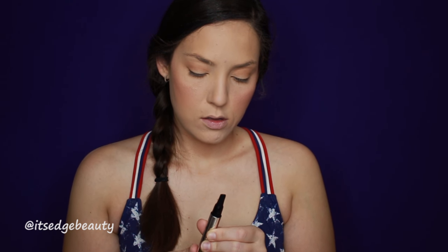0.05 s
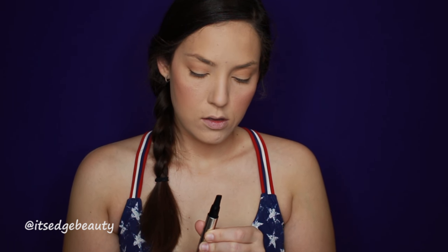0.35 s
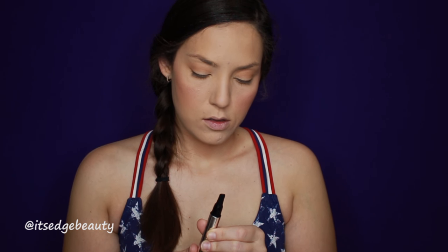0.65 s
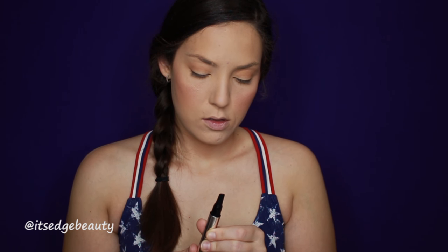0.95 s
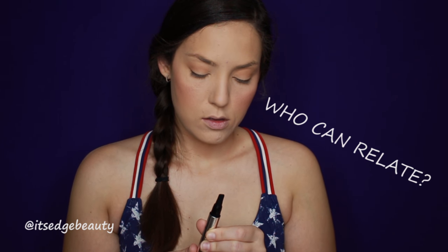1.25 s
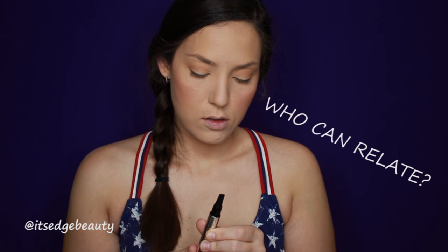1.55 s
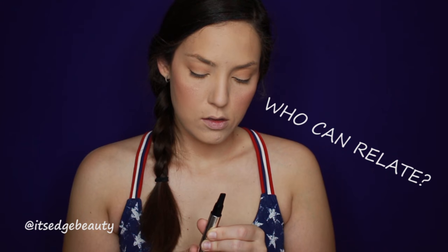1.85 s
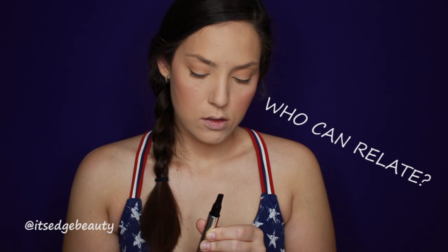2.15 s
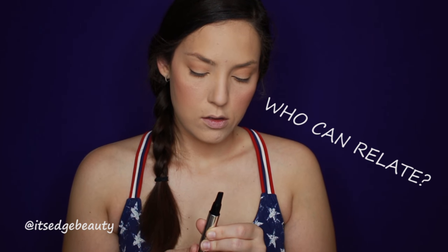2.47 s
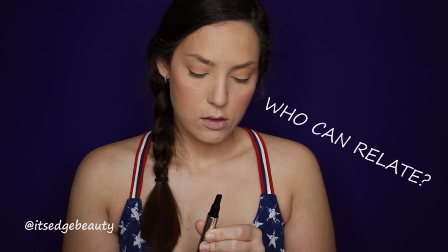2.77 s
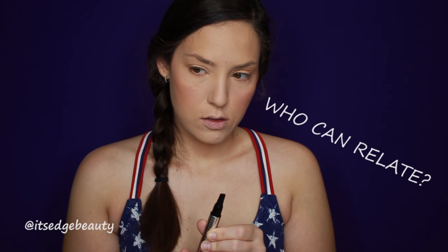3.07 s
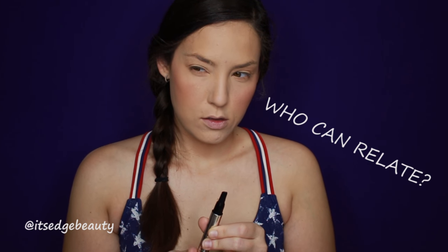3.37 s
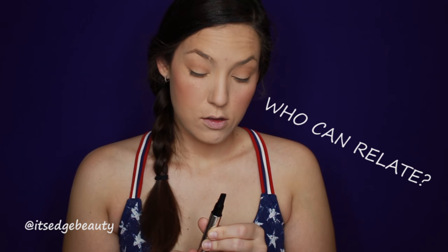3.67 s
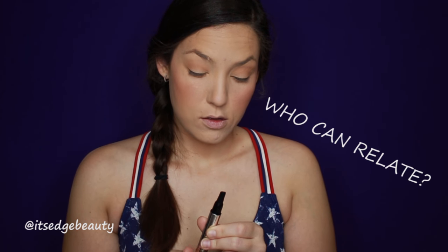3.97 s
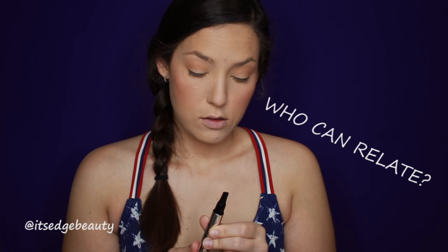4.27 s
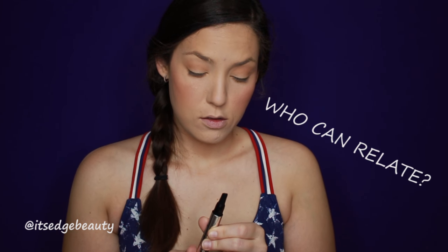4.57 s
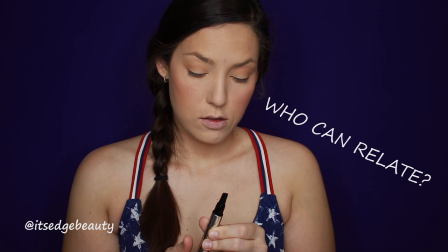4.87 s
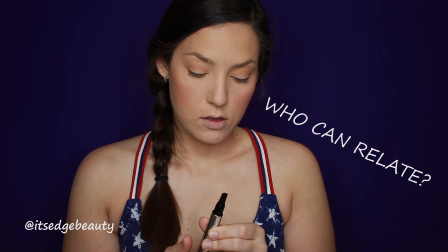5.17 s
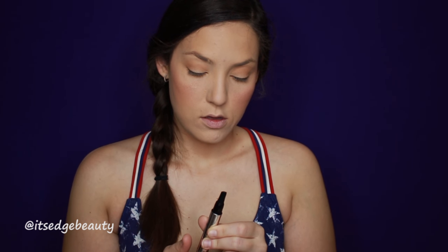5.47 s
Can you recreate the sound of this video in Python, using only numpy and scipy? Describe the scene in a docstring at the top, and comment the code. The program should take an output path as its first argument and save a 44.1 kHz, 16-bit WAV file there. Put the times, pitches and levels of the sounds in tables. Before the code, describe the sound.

A plastic cosmetic click pen is pumped close to the microphone in a small, dry room. It clicks twice, rests for over a second, then clicks fourteen more times at an even pace of four or five a second. Each press is a tiny, crisp burst of ratchet ticks. A ventilation fan hums softly underneath the whole time, with a faint rush of air.

```python
"""In a small, dry room a ventilation fan hums while a plastic click pen is pumped close by.
The fan gives a rush of air coloured by its duct, wavering tones and a low drone.
The pen is pressed twice and, after a pause, fourteen more times. Each press is a quick, slowing run
of two to five ratchet ticks: the pawl strikes tooth after tooth and rings the barrel.
The room answers each tick with a short tail of reflections."""
import sys
import numpy as np
from scipy import signal
from scipy.fft import rfft, irfft
from scipy.io import wavfile
from scipy.ndimage import uniform_filter1d

SR = 44100
rng = np.random.default_rng(int(sys.argv[2]) if len(sys.argv) > 2 else 0)


def generate_wav(signal):
    """Clip the signal to [-1, 1] and save it as 16-bit WAV at the path in sys.argv[1]."""
    frames = np.transpose(np.atleast_2d(signal))
    scaled = np.clip(frames, -1, 1) * 32767
    pcm = np.round(scaled).astype(np.int16)
    wavfile.write(sys.argv[1], SR, pcm)


N = 252693


def from_db(db):
    """Amplitude ratio: tenfold for every 20 dB."""
    return 10 ** (np.asarray(db) / 20)


def unit_energy(x):
    """Normalisation: the squared magnitudes sum to one."""
    return x / np.sqrt(np.sum(abs(x) ** 2) + 1e-20)


def curve_at(points, hz):
    """Interpolation of (frequency [Hz], value) points on a log-frequency axis."""
    f, value = np.transpose(points)
    return np.interp(np.log(hz + 1), np.log(f + 1), value)


def add(mix, start_s, sound):
    """Superposition: a sound adds to the mix from its start time on."""
    part = mix[round(start_s * SR):][:len(sound)]
    part += sound[:len(part)]


def resonant_gain(colour, modes, hz):
    """Resonance: modal peaks add in power to a broad colour."""
    peaks = sum(from_db(db) ** 2 / (1 + 2 * ((hz - f) / width) ** 2) ** 2 for f, width, db in modes)
    return np.sqrt(from_db(curve_at(colour, hz)) ** 2 + peaks)


def minimum_phase(gain):
    """Causality: a struck body rings after the blow, never before."""
    log_gain = np.log(np.concatenate([gain, gain[-2:0:-1]]) + 1e-6)
    return gain * np.exp(-1j * signal.hilbert(log_gain).imag[:len(gain)])


def fan_rush():
    """Flow noise: moving air excites the resonances of the duct."""
    # rush of air and even hiss: (frequency [Hz], spectral density [dB re 1/Hz])
    air = [(20, -92), (55, -86), (110, -72), (150, -67), (200, -78.5), (260, -66.5), (400, -75), (520, -80),
           (950, -91.5), (2400, -87), (3500, -99), (7000, -102.5), (15700, -103), (16200, -125)]
    # duct resonances: (frequency [Hz], width [Hz], peak density [dB re 1/Hz])
    duct_modes = [(179.5, 13.4, -62), (223.7, 5.4, -61), (312.3, 5, -65.5), (366, 6.9, -66), (369, 29, -73),
                  (649, 25, -70.5), (678, 18, -72), (787, 67, -77.5), (1074, 52, -82), (1425, 17, -83.5),
                  (1595, 60, -75), (1907, 18, -77.5)]
    hz = np.fft.rfftfreq(N, 1 / SR)
    gain = resonant_gain(air, duct_modes, hz) * np.sqrt(SR / 2)
    return irfft(rfft(rng.standard_normal(N)) * gain, N)


def fan_hum(waver_hz=3.0, knots=512):
    """Random modulation: the fan's tones waver in level and phase, each to its own depth."""
    # fan tones: (frequency [Hz], rms level [dB], waver [0-1])
    tones = [(44, -51.5, 0.16), (130.8, -51, 0.12), (414.2, -57.5, 0.53), (534, -61.5, 0.47),
             (1531, -66, 0), (3760, -74, 0.1)]
    t, knot_s = np.arange(N) / SR, np.linspace(0, N / SR, knots)
    low_pass = np.exp(-(np.fft.fftfreq(knots, knot_s[1]) / waver_hz) ** 2 / 2)
    out = np.zeros(N)
    for hz, db, waver in tones:
        real, imag = rng.standard_normal((2, knots))
        drift = unit_energy(np.fft.ifft((real + 1j * imag) * low_pass)) * np.sqrt(knots)
        swing = np.interp(t, knot_s, np.sqrt(1 - waver ** 2) + waver * drift)
        carrier = np.exp(2j * np.pi * (hz * t + rng.random()))
        out += from_db(db) * np.sqrt(2) * (swing * carrier).real
    return out


def ventilation_drone(rms_db=-49.5, centre_hz=87.1, width_hz=3.6):
    """Narrow-band noise: a low resonance fed by turbulence swells and ebbs at random."""
    hz = np.fft.rfftfreq(N, 1 / SR)
    gain = 1 / (1 + ((hz - centre_hz) / width_hz) ** 4)
    drone = irfft(rfft(rng.standard_normal(N)) * gain, N)
    return from_db(rms_db) * np.sqrt(N) * unit_energy(drone)


def pawl_blow(hz, lead, size, scrape_s=0.00092, touch_s=0.0009, chatter_s=0.0024, soft_hz=7000):
    """Impact spectrum: the pawl touches a tooth, scrapes over it, snaps down and chatters."""
    t = (np.arange(size) - lead) / SR  # zero at the snap
    contacts = rng.standard_normal(size) * from_db(3.0 * rng.standard_normal(size))
    contacts = unit_energy(contacts) * np.sqrt(size)
    scrape = (t < 0) * from_db(-15) * np.exp(-abs(t) / scrape_s) * contacts
    touch_lead_s = touch_s * (0.5 + rng.random())
    scrape[np.argmin(abs(t + touch_lead_s))] = 0.76  # first touch
    chatter = (t > 0) * np.exp(-(abs(t) / chatter_s) ** 1.31) * contacts
    chatter[lead] = 3.8  # the snap
    # the approach is soft and dull, the snap hard and bright
    blow = rfft(chatter) + rfft(scrape) / (1 + 1j * hz / soft_hz)
    # such short contacts feed all broad bands alike
    return blow / np.sqrt(uniform_filter1d(abs(blow) ** 2, size=90) + 1e-12)


def barrel_response(hz, colour_db, grip_detune=0.0091):
    """Modal response: the grip shifts the pen's resonances, and each tooth colours them anew."""
    # broad colour of the plastic: (frequency [Hz], level [dB])
    plastic = [(100, -29), (400, -11), (800, 1.5), (1300, -3.5), (1700, -5), (2400, 5), (3200, 6),
               (5200, 4.5), (7200, 1), (10200, 2), (11500, -1.5), (14000, -1), (15600, 4.5), (16400, -20)]
    # resonances of barrel and pawl: (frequency [Hz], width [Hz], level [dB])
    pen_modes = [(850, 150, -3.5), (3490, 360, 11), (4390, 800, 11.5), (6070, 350, 6), (6630, 520, 4),
                 (8240, 460, 6), (9110, 670, 10), (12600, 600, -1), (15100, 600, -14)]
    knock, lean, pawl, edge = colour_db
    # colour of this tooth: (frequency [Hz], level [dB])
    tooth = [(1700, knock), (2500, -lean), (3600, -lean), (4100, lean), (5300, lean),
             (6200, 0), (7500, pawl), (10500, pawl), (12000, edge)]
    modes = [(f * (1 + grip_detune * rng.standard_normal()), width, db) for f, width, db in pen_modes]
    return minimum_phase(resonant_gain(plastic, modes, hz) * from_db(curve_at(tooth, hz)))


def ratchet_tick(snap_s, energy_db, colour_db, size=2048):
    """Source and filter: the pawl's blow rings the barrel. Returns start time and sound."""
    lead, hz = size // 8, np.fft.rfftfreq(size, 1 / SR)
    ring = irfft(pawl_blow(hz, lead, size) * barrel_response(hz, colour_db))
    return snap_s - lead / SR, from_db(energy_db) * unit_energy(ring)


def pen(slowing_db=-2, tooth_spread_db=0.48):
    """Uniform deceleration: over evenly spaced teeth the ticks spread out and end weaker."""
    # presses: (first tick [s], last tick [s], teeth [count], speed lost [0-1], base energy [dB],
    # thumb's mid-stroke push [dB], then the grip's colour: knock near 1 kHz [dB],
    # lean from the lower to the upper barrel ring [dB], pawl near 9 kHz [dB])
    presses = [(0.1619, 0.2075, 4, 0.77, 7.5, -3.5, 3, -1, 4),
               (0.3910, 0.4230, 3, 0.31, 7, -1.5, 3.5, 0, 3.2), (1.7406, 1.7691, 5, 0.71, 5.5, 1, 0, 2, 3),
               (1.9483, 1.9857, 5, 0.62, 6, -1.5, 0.2, 0, 3.5), (2.153, 2.1832, 4, 0.7, 5, 1.5, 0, 1.3, 3),
               (2.3846, 2.4351, 5, 1, 7, -1.5, -.9, 0.5, 2), (2.6072, 2.649, 4, 0.55, 6.5, -2, 2.1, 0, 3),
               (2.821, 2.8569, 3, 0.86, 6, -1, 0.5, .7, 1.5),
               (3.0470, 3.0960, 3, .47, 5.5, 1.5, -0.5, -0.1, 2.4),
               (3.2752, 3.2992, 2, .5, 6.5, 0, -0.5, -2, 3), (3.4850, 3.5290, 3, 0.97, 5, 1.2, 2, 1.2, 3.5),
               (3.7164, 3.75, 2, .5, 6.5, 0, 2.5, -1.2, 4.5), (3.9634, 3.989, 2, .5, 6, 0, 3, 0, 5.5),
               (4.174, 4.1964, 2, .5, 7, 0, -0.5, 1, 4), (4.429, 4.4807, 3, 0.68, 5.5, 2.5, -0.7, 0, 5),
               (4.64, 4.6880, 3, 0.39, 5, 0.7, 3, -0.2, 4)]
    # the first tooth is met from rest: (knock [dB], lean [dB], pawl [dB], edge near 13 kHz [dB])
    first_tooth, later_tooth = (0.4, 0.5, -0.95, 2.6), (0.49, -0.063, 1.14, 1.5)
    out = np.zeros(N)
    for first_s, last_s, teeth, braking, energy_db, push_db, *grip_db in presses:
        end_speed = 1 - braking
        for travel in np.linspace(0, 1, teeth):
            speed = np.sqrt(1 - travel * (1 - end_speed ** 2))
            snap_s = first_s + (last_s - first_s) * travel * (1 + end_speed) / (1 + speed)
            level_db = energy_db + slowing_db * travel + push_db * np.sin(np.pi * travel)
            colour_db = np.add(later_tooth if travel else first_tooth, grip_db + [0])
            colour_db += tooth_spread_db * rng.standard_normal(len(colour_db))
            add(out, *ratchet_tick(snap_s, level_db, colour_db))
    return out


def room_tail(first_echo_s=0.004, size=256):
    """Reverberation: dense reflections follow the nearest surface's echo and decay exponentially."""
    # colour of the reflections: (frequency [Hz], level [dB])
    colour = [(300, -10), (1000, 3.5), (2000, 8.5), (3000, 6.5), (4300, 1.5), (5200, 6), (7500, 3),
              (8700, -1), (9800, 0.5), (12000, 0.5), (15500, -3.5)]
    # reverberation time: (frequency [Hz], time to fall 60 dB [s])
    t60 = [(500, 0.16), (2000, 0.099), (4500, 0.15), (9000, 0.15), (15000, 0.17)]
    t = np.arange(SR // 3) / SR
    reflections = rng.choice([-1, 1], len(t)) * (t > first_echo_s)
    hz, frame_s, bands = signal.stft(reflections, SR, nperseg=size)
    decay = np.exp(-np.log(1000) * frame_s / curve_at(t60, hz)[:, None])
    bands *= from_db(curve_at(colour, hz)[:, None]) * decay
    return unit_energy(signal.istft(bands, SR, nperseg=size)[1])


def room_echoes(ticks, patterns=4, crossfade_s=0.012):
    """Directivity: ticks thrown different ways meet different patterns of reflections."""
    turn = np.arange(N) / SR / crossfade_s
    out = np.zeros(N)
    for k in range(patterns):
        power_share = np.maximum(1 - abs((turn - k) % patterns - 1), 0)
        out += signal.oaconvolve(ticks * np.sqrt(power_share), room_tail())[:N]
    return out


def scene(room_db=-12.5, walls=3):
    """Superposition at one point: the pen radiates a slightly different sound toward each wall."""
    echoes = sum(room_echoes(pen()) for _ in range(walls)) / np.sqrt(walls)
    mono = pen() + from_db(room_db) * echoes + fan_rush() + fan_hum() + ventilation_drone()
    return np.array([mono, mono])


def record(dry, cutoff_hz=16800):
    """Band limiting: a steep low-pass filter removes the highest treble."""
    low_pass = signal.firwin(301, cutoff_hz, window=("kaiser", 8), fs=SR)
    return signal.oaconvolve(dry, low_pass[None], "same")


dry = scene()
out = record(dry)
generate_wav(out)
```